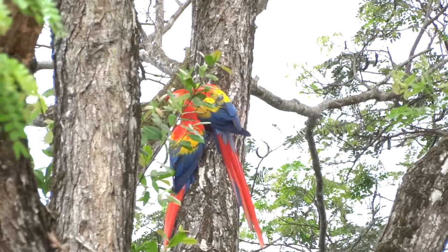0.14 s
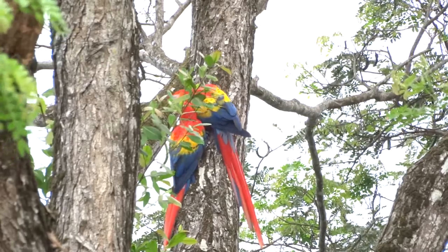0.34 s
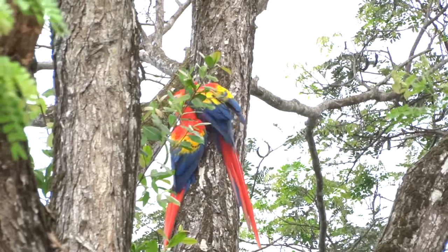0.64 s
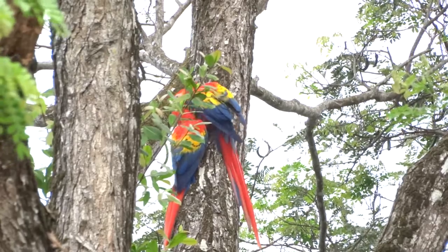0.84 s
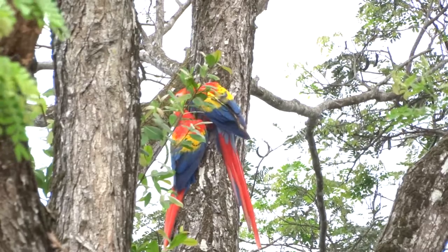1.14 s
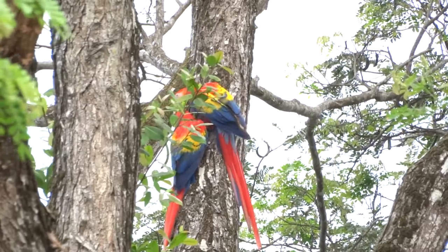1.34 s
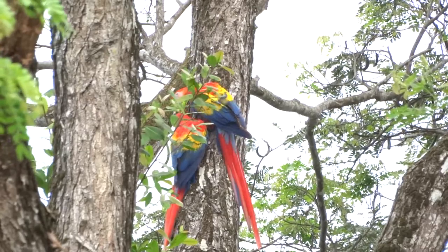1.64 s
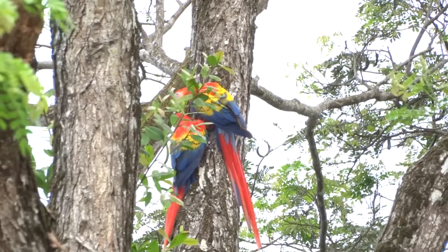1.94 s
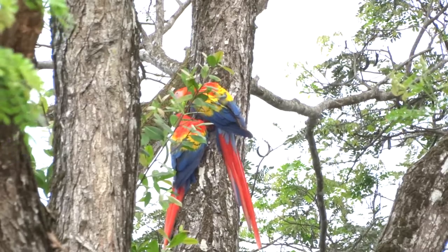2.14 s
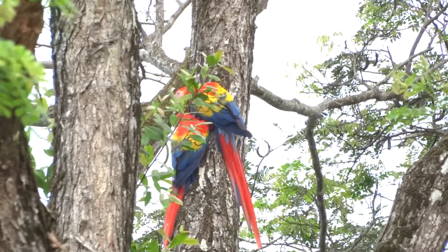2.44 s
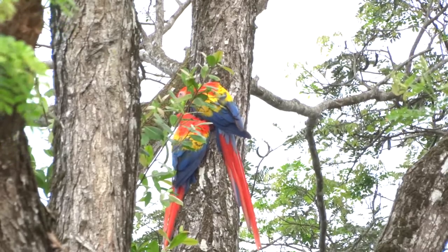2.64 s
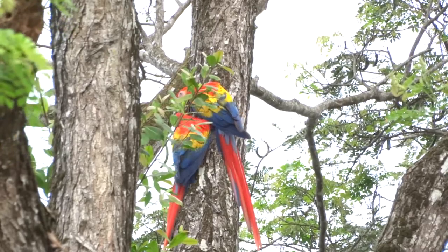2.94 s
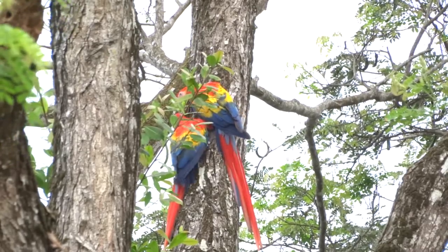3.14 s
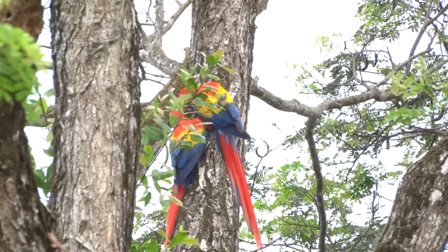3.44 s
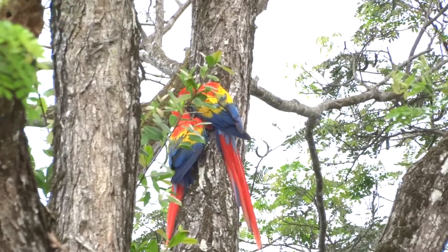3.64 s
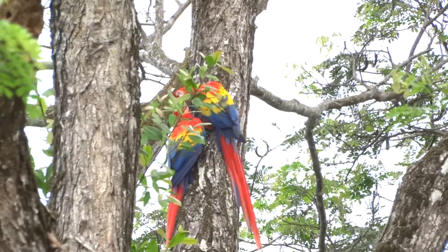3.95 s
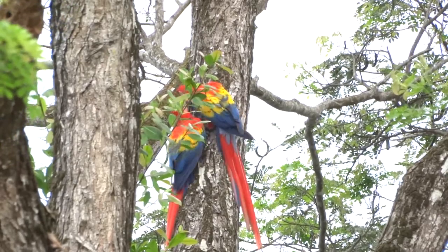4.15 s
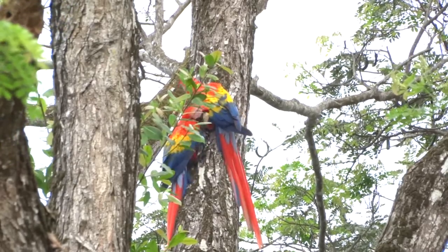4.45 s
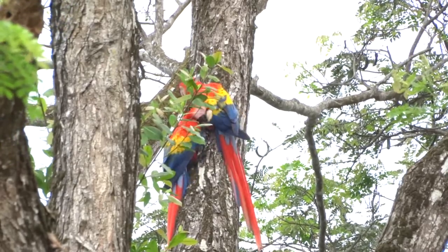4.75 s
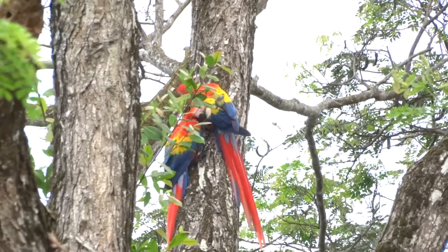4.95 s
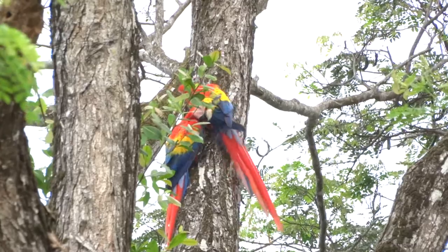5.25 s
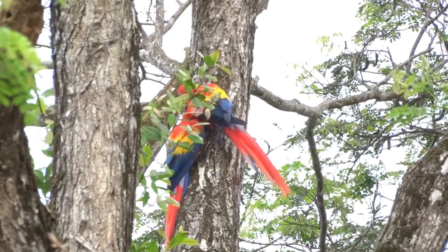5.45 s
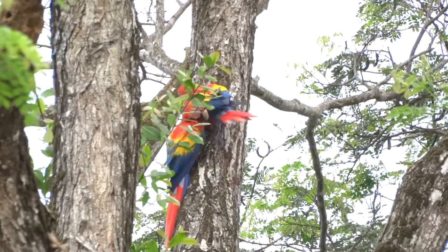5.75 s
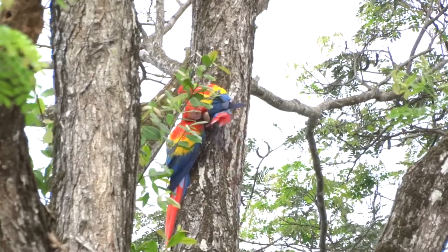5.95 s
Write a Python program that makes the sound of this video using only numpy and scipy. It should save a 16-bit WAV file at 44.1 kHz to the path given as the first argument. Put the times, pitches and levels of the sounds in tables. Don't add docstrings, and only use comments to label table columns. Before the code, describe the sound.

A steady insect drone with a high buzzing cicada and soft airy hiss lies under everything. Parrots growl, wail and mutter some way off, with spaces between calls, while little birds drop quick falling chirps and one clear whistle sounds. A single very loud double-pitched squawk then erupts close to the microphone, echoing among trees, followed by short quiet rasps and faint yelps.

```python
import sys
import numpy as np
from scipy import signal
from scipy.fft import rfft, irfft, next_fast_len
from scipy.io import wavfile
from scipy.ndimage import uniform_filter1d, map_coordinates

SR = 44100
rng = np.random.default_rng(int(sys.argv[2]) if len(sys.argv) > 2 else 0)


def nominal_scale(level):
    x = np.asarray(level, float) / 20
    return 10 ** x


def unload_audio(sound):
    columns = np.transpose(np.atleast_2d(sound))
    steps = np.round(np.clip(columns, -1, 1) * 32767)
    wavfile.write(sys.argv[1], SR, steps.astype(np.int16))


N = 268569


def unit(x):
    return x / np.sqrt(np.mean(x ** 2) + 1e-20)


def along(points, hz):
    f, v = np.transpose(points)
    return np.interp(np.log(hz + 1), np.log(f + 1), v)


def colour(points):
    return lambda hz: nominal_scale(along(points, hz))


def curves(rows, whole=False):
    s, *cols = np.transpose(rows)
    start, stop = (0, N) if whole else (max(int(s[0] * SR), 0), min(int(s[-1] * SR), N))
    t = np.arange(start, stop) / SR
    return start, [np.interp(t, s, c) for c in cols]


def level(rows):
    return curves(rows, whole=True)[1][0]


def wobble(n, rate):
    knots = rng.standard_normal(int(n * rate / SR) + 4)
    return map_coordinates(knots, [np.arange(n) * rate / SR])


def fade(n, s):
    nearest_end = np.minimum(np.arange(n), np.arange(n)[::-1])
    return np.clip(nearest_end / (s * SR), 0, 1)


def filtered(x, response):
    m = next_fast_len(x.shape[-1] + 8192)
    return irfft(rfft(x, m) * response(np.fft.rfftfreq(m, 1 / SR)), m)[..., :x.shape[-1]]


def resonances(modes):
    def response(f):
        total = 0
        for k, (centre, width, db) in enumerate(modes):
            damping = 1j * f * width
            total = total + (-1) ** k * nominal_scale(db) * damping / (centre * centre - f * f + damping + 1)
        return total
    return response


def add(out, start, x, pan_db):
    out[:, start:start + len(x)] += x[:N - start] * nominal_scale([[pan_db / 2], [-pan_db / 2]])


def scream(rows, throat, level_db, pan_db, odd_top_db=0, odd_follows=0):
    out = np.zeros((2, N))
    start, (hz, db, rough) = curves(rows)
    odd_db = odd_top_db + odd_follows * (db - db.max())
    n = len(hz)
    shaken_hz = hz * (1 + .02 * rough * wobble(n, 120) + .045 * rough * wobble(n, 500))
    phase = 2 * np.pi * np.cumsum(shaken_hz) / SR
    voice = power = 0
    for k in range(1, int(14000 / hz.max())):
        gain = nominal_scale(along(throat, k * hz) + odd_db * (k % 2))
        power = power + gain ** 2 / 2
        ragged = (k * hz / 5500) ** 2
        shake = 1 + 1.58 * rough * wobble(n, 89.2) + ragged * wobble(n, 600)
        shake = shake / np.sqrt(1 + ragged ** 2)
        voice = voice + gain * shake * np.sin(k * phase + rng.uniform(0, 2 * np.pi))
    add(out, start, nominal_scale(db + level_db) * fade(n, 0.0054) * voice / np.sqrt(power), pan_db)
    return out


# (t/s, f/Hz, level/dB, roughness 0-1)
SCREAM = [(4.585, 400, -45, 0.3), (4.603, 418.4, -35, 0.3), (4.62, 411.3, -38, 0.17),
          (4.635, 436.5, -25, 0.35), (4.647, 441.4, -48, 0.52), (4.66, 441.7, -21.5, 0.26),
          (4.68, 433.2, -19, 0.31), (4.703, 441.3, -21.5, 0.3), (4.725, 449.5, -20.5, 0.35),
          (4.75, 429.7, -16, 0.01), (4.775, 427.5, -14, 0.06), (4.805, 425, -15.5, 0.07),
          (4.82, 403, -17, 0.2), (4.832, 388, -28, 0.2)]
RIVAL = [(4.595, 990, -35, 0.5), (4.64, 977, -26.5, 0.42), (4.68, 1000, -28, 0.53), (4.705, 968, -31, 0.67),
         (4.725, 980, -25.5, 0.15), (4.746, 977, -27, .08)]
# (f/Hz, level/dB)
SCREAM_THROAT = [(400, -49.5), (860, -13), (1290, -14), (1720, -1.5), (2150, 4), (2580, -18), (3000, -20),
                 (3450, -18), (3880, -32), (4700, -25.5), (5900, -18.5), (7300, -25.5), (9000, -25.5),
                 (11000, -48), (14000, -62)]
RIVAL_THROAT = [(900, -36), (1950, -3), (2930, 1.5), (3900, -17), (5850, -7), (7000, -4.5), (8000, -8),
                (10000, -45), (14000, -58)]


def near_scream():
    low = scream(SCREAM, SCREAM_THROAT, level_db=-0.5, pan_db=1.5, odd_top_db=-1.0, odd_follows=0.78)
    return low + scream(RIVAL, RIVAL_THROAT, level_db=-2.5, pan_db=2.0)


# (t/s, level/dB)
HISS = [(4.575, -57), (4.6, -42), (4.66, -41), (4.74, -31), (4.8, -41), (4.83, -41), (4.855, -48),
        (4.88, -60)]
# (f/Hz, level/dB per Hz)
HISS_COLOUR = [(3500, -37), (4500, -11), (5200, 3), (6000, 8), (7200, 5), (8300, -8), (9500, -18),
               (11000, -30), (12500, -40), (14000, -52), (15000, -100)]


def hiss():
    out = np.zeros((2, N))
    start, (db,) = curves(HISS)
    air = unit(filtered(rng.standard_normal(len(db)), colour(HISS_COLOUR)))
    add(out, start, nominal_scale(db + 2.5 * wobble(len(db), 71)) * air, pan_db=-1.0)
    return out


def glides(rows, bend, quaver):
    out = np.zeros((2, N))
    for s, length, start_hz, end_hz, db in rows:
        u = np.linspace(0, 1, int(length * SR))
        hz = end_hz + (start_hz - end_hz) * (1 - u) ** bend
        hz = hz * (1 + quaver * wobble(len(u), 400))
        swell = np.sin(np.pi * u ** 1.86) ** 0.44 * nominal_scale(3.3 * wobble(len(u), 46))
        add(out, int(s * SR), nominal_scale(db + 2.5) * swell * np.sin(2 * np.pi * np.cumsum(hz) / SR), .4)
    return out


# (t/s, length/s, f/Hz, level/dB)
BREAKS = [
    (2.2, 0.018, 1150, -39.5),
    (2.022, 0.027, 1140, -34.5),
    (2.045, .04, 1530, -40),
    (2.075, 0.022, 1210, -40),
    (4.636, 0.015, 2910, -22.5),
    (4.709, 0.056, 3300, -32),
    (4.71, 0.041, 5880, -32),
    (4.66, 0.037, 5860, -33.5),
    (4.636, 0.016, 1440, -32.5),
    (.545, 0.026, 3100, -35),
]


def breaks():
    return glides([(s, length, hz, .98 * hz, db) for s, length, hz, db in BREAKS], 0.79, 0)


def envelope(s, swell, length, db):
    attack_s, release_s = 0.023, 0.035
    peak = max(swell, attack_s + .002)
    end = max(length, peak + .002)
    last = db - 84 * (end - peak)
    return [(s, db - 20), (s + attack_s, db - 7 * (1 - attack_s / peak)), (s + peak, db),
            (s + end, last), (s + end + release_s, last - 32)]


# (t/s, swell to the peak/s, length/s, peak level/dB, pulse rate f/Hz)
CROAKS = [(-.05, 0.095, 0.14, -26, 113), (.12, 0.21, 0.6, -33.5, 216), (.52, 0.03, 0.17, -32, 198),
          (1.051, 0.049, 0.12, -44.5, 210), (1.453, 0.034, 0.15, -36, 188), (1.994, 0.065, 0.18, -36, 202),
          (2.303, 0.085, 0.2, -35, 232), (2.952, 0.16, 0.2, -32, 187), (3.343, 0.07, 0.17, -26, 128),
          (3.492, 0.13, 0.14, -33, 175), (3.944, 0.037, 0.033, -39.5, 197),
          (4.648, 0.064, 0.17, -16.5, 417), (4.971, 0.057, 0.098, -31, 205),
          (5.188, 0.065, 0.11, -33.5, 260), (5.489, 0.099, 0.096, -37, 220),
          (5.687, 0.023, 0.061, -34, 343), (6.046, 0.043, .07, -34, 300), (0.7, 0.11, 0.15, -46, 186),
          (4.807, 0.025, 0.072, -13, 400), (4.53, .05, 0.062, -39, 260), (1.3, 0.023, 0.13, -46, 280),
          (3.228, 0.055, 0.18, -41, 230), (3.805, 0.022, 0.025, -41, 200), (1.899, 0.12, 0.12, -41.5, 210),
          (4.584, 0.039, .045, -27, 420)]
# (f/Hz, level/dB)
MOUTHS = [
    [(1225, -11.5), (1540, -2), (2130, 2.5), (3900, 3)],
    [(1390, -15), (1740, -4.5), (2720, 3.5), (3200, -1)],
    [(1460, 8), (1900, 5), (3080, 7.5), (3540, 11), (3900, 10)],
    [(1540, 0)],
    [(1510, -7.5), (1870, -5), (2550, 4.5), (2950, 2.5), (3350, 4)],
    [(1140, -4), (1640, 4), (2350, -13), (2750, 5), (3100, 2)],
    [(915, -6.5), (1550, -1.5), (2150, 0), (2550, 4), (3200, 11.5), (4300, 2)],
    [(1400, -0.5), (1580, 0), (1780, -2.5), (2600, -1.5), (2830, 4.5), (3220, 0.5), (4620, -2)],
    [(1560, 5.5), (1800, 6.5), (2180, 8.5), (3410, 5.5), (4300, 2), (5100, -2)],
    [(1450, 1.5), (2170, -7), (2560, 5), (3050, 1)],
    [(910, -15.5), (1310, -3)],
    [(1738, -13), (2145, -5.5), (2600, -9.5)],
    [(1896, -7), (2233, -3), (2740, -9)],
    [(1423, -9), (1830, -5), (2160, -6.5), (3540, -5)],
    [(1400, -8), (2170, 7)],
    [(2024, 2), (2780, -3)],
    [(1630, -2), (2180, -3)],
    [(2600, 6), (3090, 25)],
    [(1180, -8.5), (1740, 1.5), (2140, 4), (2460, -5)],
    [(1735, -1), (2150, -7), (2600, 0), (2800, 1)],
    [(1500, -3), (2550, 6), (2800, 0)],
    [(1500, -6), (2950, -1), (3500, 2)],
    [(950, -9), (1450, 4)],
    [(1240, 2), (1600, 6), (2200, -11)],
    [(850, -10), (1700, -6), (2150, 7), (2900, 2.5)],
]
# (resonance over its width [ratio], ring level/dB)
BEAKS = [(10, 4.5), (9, 6), (25, 1.5), (20, 8), (14, 7), (22, -4), (24, -0.5), (32.3, 3), (24.7, 4.5),
         (40, 3), (18, -1), (30, 5), (30.3, 6.5), (22.1, 3), (20, 6.5), (28, 3), (40, 8.5), (20, -5),
         (20.1, 7.5), (25, 5), (15, 12), (18, -1), (10.02, 3), (15, -1), (14, 7)]
# (f/Hz, level/dB per Hz)
RASP = [(250, -61.5), (700, -11.5), (1100, -7.5), (1750, -6.5), (3000, -6.5), (4300, -18), (5200, -21),
        (9000, -34), (12500, -100)]
RASP_NEAR = [(150, -110), (400, -37.5), (800, -10.5), (1700, -11.5), (2300, -2.5), (3100, -16.5),
             (4000, -20), (5200, -16), (6800, -33), (8200, -22), (11000, -36), (13000, -62), (15000, -110)]


def croaks():
    out = np.zeros((2, N))
    ring_colour = colour([(300, -32), (700, 11.0), (4500, -14.0), (7000, -21), (12000, -90)])
    for (*shape, rate), mouth, (sharpness, ring_db) in zip(CROAKS, MOUTHS, BEAKS):
        start, (db,) = curves(envelope(*shape))
        n = len(db)
        near = db.max() > -22
        growl = rate < 170
        jitter = 0.12 if growl else 0.3
        breath = 0.95 if near else 0.68 if growl else 0.89

        cycle = np.cumsum(rate * np.exp(jitter * wobble(n, 120)) / SR)
        slaps = (np.diff(np.floor(cycle), prepend=0) > 0) * nominal_scale(2.0 * rng.standard_normal(n))
        puffs = np.exp(-1.6 * (cycle % 1)) * rng.standard_normal(n)
        source = np.sqrt(1 - breath) * unit(slaps) + np.sqrt(breath) * unit(puffs)

        broad = filtered(source, colour(RASP_NEAR if near else RASP))
        modes = [(hz, hz / sharpness, mode_db) for hz, mode_db in mouth]
        ring = filtered(filtered(source, resonances(modes)), ring_colour)
        ring = map_coordinates(ring, [np.arange(n) + np.cumsum(.013 * wobble(n, 22))])
        voice = unit(unit(broad) + nominal_scale(ring_db) * unit(ring))
        call = nominal_scale(db - (10 if near else 1.5)) * fade(n, 0.0018) * voice
        add(out, start, call, pan_db=.9 if near else -.4)
    return out


# (t/s, f/Hz, level/dB, roughness 0-1)
WAIL = [(.17, 426.9, -34, 0.78), (.23, 434.7, -36.5, 0.77), (.26, 452.4, -30, 0.39),
        (.3, 444.7, -29.5, 0.51), (.37, 455.6, -34, 0.53), (.42, 468.8, -34.5, 0.44), (.49, 456, -38, 0.63),
        (.53, 434.3, -32.5, .25), (.575, 384, -30, 0.26), (.62, 385.4, -39, 0.41)]
# (f/Hz, level/dB)
WAIL_THROAT = [(400, -36), (900, -2), (1350, -4.5), (1800, 3.5), (2250, 2.5), (2700, 5), (3200, -2),
               (4100, -2), (5000, -40), (9000, -96)]


def wail():
    return scream(WAIL, WAIL_THROAT, level_db=-3.0, pan_db=-1.0, odd_top_db=1.0, odd_follows=0.98)


# (t/s, f/Hz, level/dB, roughness 0-1)
YELP = [
    [(5.69, 667, -45, .4), (5.705, 681, -46.5, 0.58), (5.78, 677, -61.5, .45)],
    [(6, 641, -69, .18), (6.04, 676, -55.5, 0.16), (6.09, 732, -55, 0.2)],
]
# (f/Hz, level/dB)
YELP_THROAT = [(400, -6), (690, 0), (1380, 7.5), (2070, 14), (2760, 9.5), (4100, 5), (5500, -38)]


def yelps():
    bright = scream(YELP[0], YELP_THROAT, level_db=6.0, pan_db=0.0)
    return bright + scream(YELP[1], YELP_THROAT[:3] + [(2500, -42)], level_db=7.0, pan_db=0.0)


# (t/s, f/Hz, level/dB, roughness 0-1)
CROON = [(3.49, 364.1, -39, 0.28), (3.53, 367.8, -38.5, 0.23), (3.56, 355.3, -38, .3),
         (3.59, 362.5, -36.5, 0.17), (3.625, 362, -35, 0.13), (3.655, 340, -37, 0.37)]
CHUCKLES = [
    [(1.48, 372, -57, 0.56), (1.52, 373.3, -43, 0.35), (1.6, 375, -45.5, .3), (1.65, 376, -49, 0.54)],
    [(1.92, 380.4, -50, 0.1), (1.955, 378.7, -45, 0.2), (1.99, 379, -52, 0.38), (2.045, 378.4, -33.5, 0.26),
     (2.075, 378, -41, 0.2), (2.11, 370, -57, 0.5)],
]
# (f/Hz, level/dB)
CROON_THROAT = [(400, -41), (730, -9), (1090, -12), (1450, 4.5), (1820, 0), (2180, 3), (2550, 2),
                (2900, -8), (3600, -22), (5000, -40), (9000, -98)]
CHUCKLE_THROATS = [
    [(400, -38), (1120, -24), (1490, 3), (1870, -4), (2240, -13), (2600, -10), (3300, -9), (4000, -2),
     (6000, -60)],
    [(400, -47), (760, -33), (1135, -8), (1515, 4), (1890, -4), (2300, -14), (2700, -4), (3400, -11),
     (5000, -50)],
]


def soft_calls():
    out = scream(CROON, CROON_THROAT, level_db=-0.5, pan_db=-1.0)
    for rows, throat in zip(CHUCKLES, CHUCKLE_THROATS):
        out += scream(rows, throat, level_db=-1.5, pan_db=-1.0)
    return out


# (t/s, length/s, start f/Hz, end f/Hz, level/dB)
CHIRPS = [(0.588, 0.047, 7540, 5750, -45), (0.622, 0.13, 8700, 5770, -45.5), (0.883, .035, 6140, 6000, -48),
          (0.967, 0.043, 7600, 5800, -44), (1.162, 0.024, 6440, 5900, -51), (1.257, 0.093, 7600, 5930, -53),
          (1.511, 0.074, 7200, 5900, -51), (1.655, 0.06, 6700, 6150, -51.5), (1.75, 0.16, 9150, 6200, -49),
          (2.045, 0.088, 7760, 6400, -45), (2.258, 0.04, 6600, 6150, -48), (2.32, 0.14, 8900, 6400, -50),
          (2.45, 0.076, 6000, 5000, -54), (2.715, .045, 6600, 6200, -52), (2.842, 0.029, 6170, 5970, -48),
          (2.976, 0.037, 6260, 6140, -46.5), (3.094, 0.033, 6300, 5960, -45),
          (3.162, 0.046, 8060, 6070, -50)]
PEEPS = [(.25, 0.064, 8470, 8540, -43), (0.752, 0.025, 4600, 4820, -51), (0.78, 0.032, 5050, 5460, -44),
         (.815, .04, 5420, 5200, -55), (1.15, 0.045, 3420, 3200, -54), (0.878, 0.045, 6540, 6840, -48),
         (0.985, 0.069, 3890, 2860, -49.5), (1.091, 0.066, 3000, 3450, -51), (2.66, 0.029, 3490, 3650, -53),
         (2.685, 0.0245, 3650, 3030, -54), (3.696, 0.044, 4990, 5220, -45.5),
         (3.695, .165, 3280, 4050, -48.5), (3.855, 0.024, 4030, 6300, -47), (3.75, 0.063, 5200, 5660, -56),
         (4.122, 0.057, 6450, 7260, -50.5), (5.326, 0.013, 3370, 3460, -41), (5.58, 0.02, 3210, 3400, -50)]


def small_birds():
    return glides(CHIRPS, bend=1.3, quaver=.005) + glides(PEEPS, bend=1.1, quaver=.008)


# (t/s, f/Hz, level/dB)
WHISTLE = [(3.864, 2635, -42), (3.876, 3010, -40.5), (3.895, 3200, -41), (3.93, 3282, -35.5),
           (3.975, 3300, -40.5), (4, 3317, -52), (4.035, 3230, -46), (4.05, 3150, -63)]


def whistle():
    out = np.zeros((2, N))
    start, (hz, db) = curves(WHISTLE)
    phase = 2 * np.pi * np.cumsum(hz) / SR
    tone = np.sin(phase) + nominal_scale(-24) * np.sin(2 * phase)
    add(out, start, nominal_scale(db + 2.5) * fade(len(hz), .004) * tone, .3)
    return out


# (t/s, peak level/dB)
TICKS = [(0.0752, -33), (0.16, -27), (0.1994, -34), (0.231, -29), (0.2713, -33), (0.326, -86),
         (0.3694, -55), (0.4794, -61), (0.6594, -57), (0.8494, -41), (1.0194, -64), (2.6794, -62),
         (2.8394, -57), (3.4894, -64), (3.8195, -43), (4.0794, -67), (4.2494, -60), (5.7194, -65)]


def ticks():
    snaps = np.zeros(N + SR // 20)
    t = np.arange(SR // 20) / SR
    for s, db in TICKS:
        snaps[int(s * SR):][:len(t)] += nominal_scale(db - 60 * t / .01) * rng.standard_normal(len(t))
    bright = [(2500, -40), (5000, 5), (7000, 11), (9500, -10), (12000, -7), (15500, -15)]
    return nominal_scale(-4.0) * filtered(snaps[:N], colour(bright))


# (f/Hz, left-right correlation 0-1)
ALIKE = [(60, .8), (300, .93), (1500, .93), (5000, .97), (9000, .93), (13000, .995)]


def rush(response, patchy_db):
    z = signal.stft(rng.standard_normal((2, N + 512)), nperseg=512)[2]
    field = uniform_filter1d(rng.standard_normal(z.shape[1:]), size=5, axis=0)
    field = uniform_filter1d(field, size=12, axis=1)
    pair = signal.istft(z * nominal_scale(patchy_db * unit(field)), nperseg=512)[1][:, :N]

    def mid_side(hz):
        turn = np.arccos(np.clip(along(ALIKE, hz), -1, 1)) / 2
        return response(hz) * np.array([np.cos(turn), np.sin(turn)])
    mid, side = filtered(pair, mid_side)
    return unit(np.array([mid + side, mid - side]))


# (f/Hz, level/dB per Hz)
LEAVES = [(2500, -22), (5000, 7.5), (9000, -6), (11000, -3), (14000, -8), (15500, -27)]


def leaves():
    t = np.arange(N) / SR
    gust_db = np.maximum(-48 - 68 * abs(t - 0.14), -101)
    return nominal_scale(gust_db - 1.0 + 5.9 * wobble(N, 24.4)) * rush(colour(LEAVES), patchy_db=5.0)


# (f/Hz, width/Hz, level/dB)
DRONES = [
    (2184, 125, 6.5),
    (1266, 146, 3.5),
    (6610, 250, -2.5),
    (5110, 80, -17),
]
# (t/s, level/dB)
DRONING = [(0, -34), (.35, -42), (.75, -48), (2.2, -48), (2.8, -49.5), (3.4, -50.5), (5.2, -44),
           (6.09, -44.5)]
# (t/s, level/dB)
CICADA = [
    (0, -77),
    (1.2, -58),
    (1.5, -36),
    (1.9, -46),
    (6.09, -42.5),
]


def insects():
    drone_noise = rush(lambda hz: resonances(DRONES)(hz) ** 2, patchy_db=1.5)
    drones = nominal_scale(level(DRONING) + 1.5 * wobble(N, 25)) * drone_noise
    beat = np.exp(1.1 * np.cos(2 * np.pi * np.cumsum(83.2 + .3 * wobble(N, 3)) / SR))
    buzz = rush(lambda hz: resonances([(9500, 600, 0)])(hz) ** 2, patchy_db=-2.0)
    cicada = nominal_scale(level(CICADA) - 16.0) * unit(beat * buzz)
    return filtered(drones + cicada, colour([(10200, -3.5), (13000, -61)]))


# (t/s, level/dB)
BREEZE = [(0, 5), (1.3, 1.2), (3.4, 0.5), (5.3, -0.54), (6.09, -4.5)]
# (f/Hz, level/dB per Hz)
LOW_AIR = [(180, -74), (300, -34), (645, -7), (760, -6.5), (826, -6), (2220, -6), (2440, -4.5),
           (5000, -11.5), (6500, -29), (11000, -120)]
HIGH_AIR = [(3000, -34.5), (4500, -12), (5700, -8), (6800, -2.5), (8000, -3.5), (10000, -5.5),
            (10600, -20.5), (12000, -25), (13500, -77)]


def breeze():
    t = np.arange(N) / SR
    breeze_db = level(BREEZE)
    low_db = -49 + breeze_db + 18.5 * np.exp(-t / 0.049)
    high_db = -50.5 + breeze_db + 5 * np.exp(-t / 0.1)
    low = nominal_scale(low_db + 0.17 * wobble(N, 4.04)) * rush(colour(LOW_AIR), patchy_db=3.0)
    high = nominal_scale(high_db + 0.087 * wobble(N, 5.0)) * rush(colour(HIGH_AIR), patchy_db=1.7)
    return low + high


# (f/Hz, level/dB per Hz)
RUMBLE = [(20, -9), (100, -9.5), (200, 0.5), (400, 1), (700, 10), (1500, -120)]


def rumble_and_hum():
    t = np.arange(N) / SR
    rumble_db = -79.5 + 1.73 * t
    rumble = nominal_scale(rumble_db + 0.25 * wobble(N, 4.8)) * rush(colour(RUMBLE), patchy_db=1.5)
    hum = nominal_scale(-89.0 + 3.2 * wobble(N, 8)) * np.sin(2 * np.pi * 120 * t)
    return rumble + hum


# (f/Hz, t60/s)
TREES = [(400, 1), (2000, 0.48), (6000, 0.73), (12000, 0.021)]


def trunks(x):
    hz, t, z = signal.stft(rng.standard_normal((2, SR // 2)), SR, nperseg=256)
    decay = nominal_scale(-60 * t / along(TREES, hz)[:, None])
    tail = signal.istft(z * decay, SR, nperseg=256)[1]
    tail = tail[0] + 0.17 * tail[1] * np.array([[1], [-1]])
    delayed = np.pad(x.mean(axis=0), (500, 0))[None]
    return signal.fftconvolve(delayed, tail / np.linalg.norm(tail[0]), axes=1)[:, :N]


def scene():
    near = near_scream() + hiss() + breaks()
    far = croaks() + wail() + yelps()
    soft = soft_calls()
    birds = small_birds() + whistle()
    forest = leaves() + insects() + breeze() + rumble_and_hum()
    echoes = trunks(nominal_scale(-16.0) * near + nominal_scale(-7.5) * far + nominal_scale(-13.5) * soft + nominal_scale(-6.5) * birds)
    return near + far + soft + birds + ticks() + forest * nominal_scale([[-.3], [.3]]) + echoes


def band_limit(x):
    return signal.sosfilt(signal.butter(12, 15490, fs=SR, output="sos"), x)


def record(dry):
    mix = dry * np.minimum(np.arange(N) / (.008 * SR), 1)
    return band_limit(mix)


dry = scene()
out = record(dry)
unload_audio(out)
```